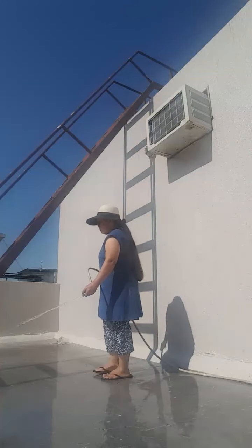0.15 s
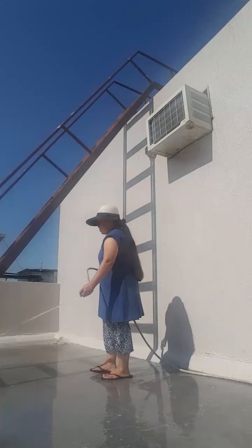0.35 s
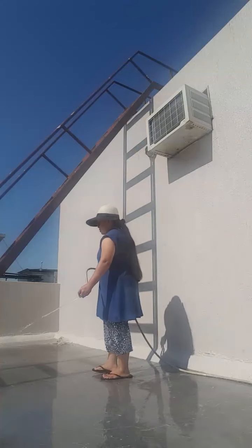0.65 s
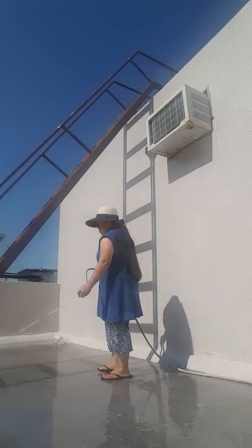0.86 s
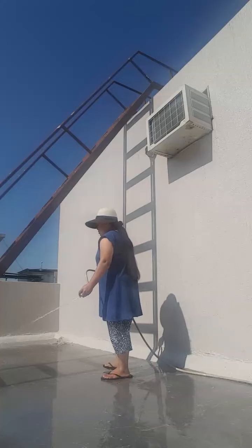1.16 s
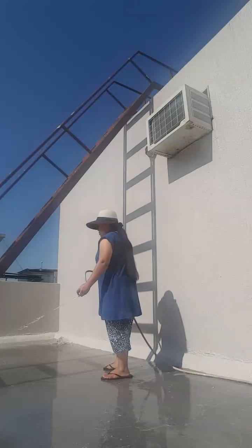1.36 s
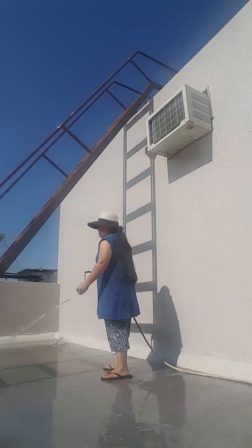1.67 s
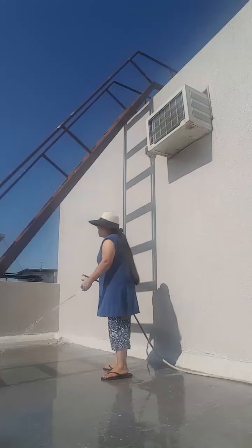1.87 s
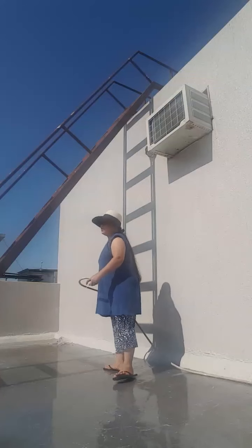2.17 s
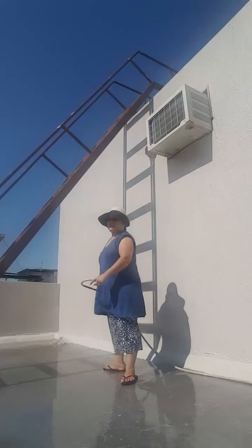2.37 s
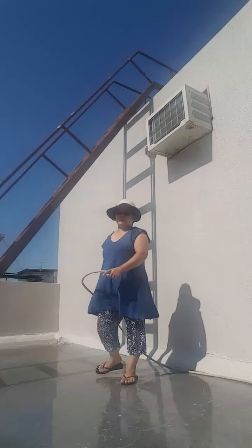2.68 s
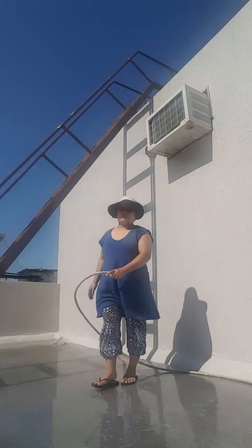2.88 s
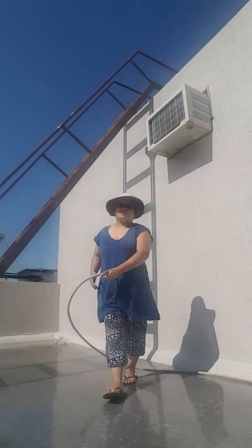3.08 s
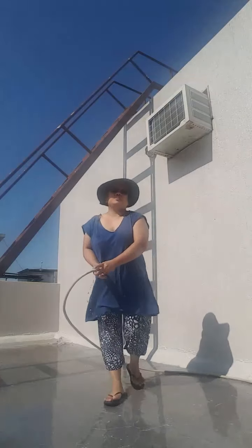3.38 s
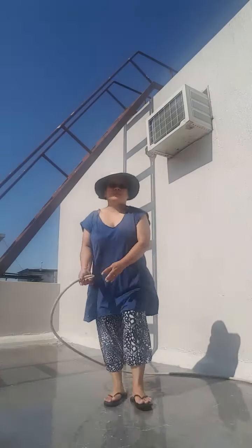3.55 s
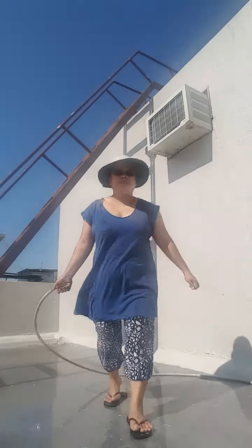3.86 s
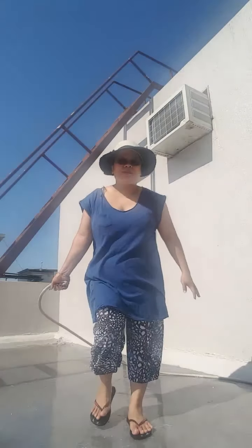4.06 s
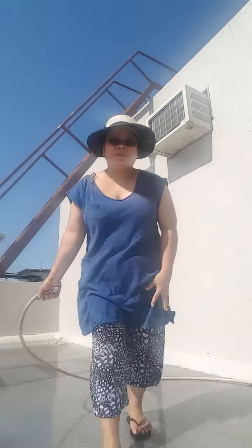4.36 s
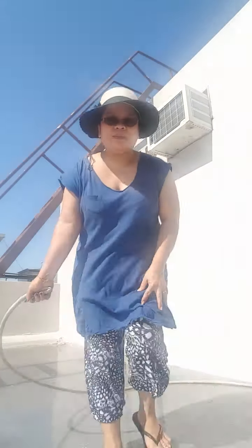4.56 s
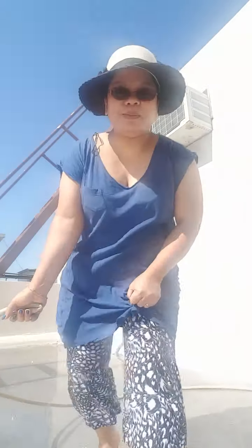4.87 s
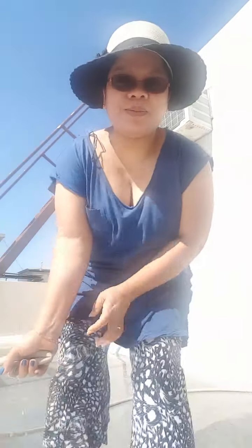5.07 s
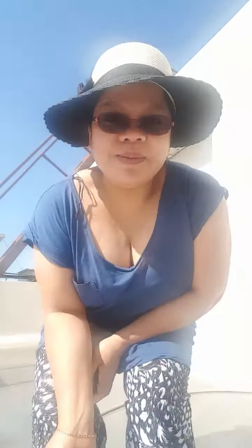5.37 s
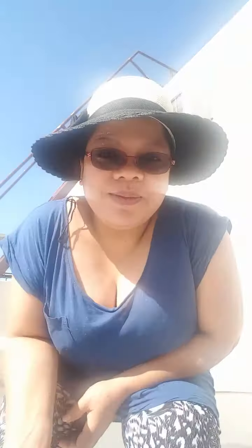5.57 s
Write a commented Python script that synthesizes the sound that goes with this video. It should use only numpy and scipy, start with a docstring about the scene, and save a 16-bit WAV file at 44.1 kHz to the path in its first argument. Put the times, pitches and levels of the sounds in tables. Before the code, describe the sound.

From 0 to about 2 seconds, a hose jet makes a dense, bright, hissing splatter on wet concrete, slightly uneven, with duller patter and sharp single drops standing out near 0.5, 0.7, 1.3 and 1.5 seconds. Soft low wind thuds hit the microphone around 1.3 to 1.9. Just after 2.0 the spray falls away within a few tenths of a second to a faint dribble. A steady low motor hum, with a firm octave and fluttering fan rush, runs throughout and swells slightly at the end. Small birds give brief sweeping chirps near 1.7, 2.1, 2.7, 3.3, 4.1 and 5.6, with fainter distant calls. From 3.1, wet sandals slap and squelch irregularly, stronger near 3.6, 4.2 and 4.7, amid fine drips growing clearer. Soft brushing and dragging follow around 5.1, a small click at 5.4, and a faint airy rustle closes it. Nearby walls give short reflections.

```python
"""On a concrete roof with walls, a hose sprays for two seconds, then the splatter dies away.
The splatter is a random hail of tiny hits; single drops and wet sandal steps are short bursts of noise.
A motor, likely an air conditioner, hums in sines over the noisy rush of its fan; small birds call in
gliding sines, and puffs of wind thud. Walls throw back the splatter, drips, steps and bird calls."""
import sys
import numpy as np
from scipy import signal
from scipy.fft import rfft, irfft, next_fast_len
from scipy.io import wavfile
from scipy.ndimage import uniform_filter1d, map_coordinates

SR = 44100
rng = np.random.default_rng(int(sys.argv[2]) if len(sys.argv) > 2 else 0)


def master_out(mix):
    """Clip the mix to full scale and print it as 16-bit PCM to the path in sys.argv[1]."""
    frames = np.transpose(np.atleast_2d(mix))
    ceiling = np.clip(frames, -1, 1)
    pcm = np.round(ceiling * 32767).astype(np.int16)
    wavfile.write(sys.argv[1], SR, pcm)


N = 252693
TIME = np.arange(N) / SR

# Tone colour of the splatter. Each row: frequency in Hz, relative level in dB per Hz.
SPLATTER_COLOUR = [(1000, -43), (2000, -7), (2500, -12.5), (3300, -10.5), (4600, -7.5), (6500, -4),
                   (7400, -6.5), (8450, 2.5), (8950, -4.5), (9300, -2), (10700, -13.5), (11350, -5),
                   (12050, -14.5), (12600, -6), (14400, -14), (15500, -15.5)]
# Duller patter where the core of the jet lands, changing as it is swept.
# Each row: time in seconds, relative level in dB, centre in Hz.
PATTER_PATH = [(0, -55, 3350), (.3, -44, 3280), (.6, -65, 3820), (.9, -40, 4740), (1.2, -58, 4700),
               (1.45, -46, 4900), (1.75, -40, 4300), (2.2, -72, 4300), (2.5, -80, 4200)]
# The loudest close drops. Each row: start in seconds, peak in dB, centre in Hz.
CLOSE_DROPS = [(0.024, -19, 7900), (.1776, -20, 8300), (.5283, -16, 10000), (0.7368, -14.5, 8800),
               (1.3318, -16, 7000), (1.369, -19.5, 8000), (1.545, -17, 8100), (2.469, -42, 10000),
               (2.5357, -39, 9000)]
# Wet sandal slaps and squelches. Each row: start in seconds, peak in dB before reflections,
# centre in Hz, time to fade by 60 dB in seconds, sharpness q of the ring.
SANDAL_SLAPS = [(3.1419, -32, 11000, 0.023, 1), (3.149, -31, 5800, 0.025, 0.91),
                (3.5819, -26.5, 10800, 0.022, 0.56), (3.6113, -24, 3600, 0.028, 0.84),
                (3.643, -35, 4000, 0.024, 1.4), (3.7, -28.5, 6200, 0.013, 3.5),
                (3.7934, -34, 7000, 0.045, 0.92), (3.821, -29, 3600, .02, 2),
                (3.8343, -25, 5700, 0.0085, 2.2), (3.9518, -27, 1800, 0.035, 0.83),
                (4.2079, -20, 2200, 0.022, 1.3), (4.211, -29, 6500, 0.015, 2.6),
                (4.221, -41, 5000, 0.022, 1.5), (4.583, -37.5, 2720, 0.04, 4.9),
                (4.7167, -26, 2880, 0.034, 8), (4.7402, -38, 5000, 0.015, 1.3),
                (4.752, -23.5, 2050, 0.016, 4), (4.764, -36, 3000, 0.02, 1.5),
                (4.836, -35.5, 4000, 0.026, 1.5), (5.181, -33, 7800, 0.034, 1.1),
                (5.429, -21, 2000, 0.004, 5.9)]
# Soles, hose and clothes brushing. Each row: start in seconds, length in seconds,
# level in dB before reflections, centre in Hz, sharpness q.
BRUSHES = [(3.234, 0.075, -44, 8360, 0.32), (3.592, 0.15, -59, 6450, 0.91), (4.703, 0.062, -49, 2700, 1),
           (4.714, 0.065, -59, 5800, 1.7), (4.876, 0.1, -58, 7000, 0.78), (5.115, 0.26, -48, 1600, 2.8),
           (5.225, 0.096, -56, 6400, 4.5), (5.578, 0.33, -58.5, 14300, 1.9)]
# The motor's lowest tone. Each row: time in seconds, relative level in dB.
MOTOR_LOW_LEVEL = [(0.08, -28.5), (0.53, -26), (0.66, -30), (0.84, -25), (1.67, -27.5), (1.7, -35),
                   (1.78, -26.5), (2.12, -23), (2.31, -28.5), (2.97, -28.5), (3.14, -23), (3.7, -28.5),
                   (3.82, -24.5), (4.59, -26.5), (4.71, -32.5), (4.81, -27.5), (5.59, -25), (5.68, -30.5)]
# Its octave, which swells at the end. Each row: time in seconds, level in dB.
MOTOR_OCTAVE_LEVEL = [(0, -21.5), (2.1, -21), (2.85, -22), (3.95, -21), (4.58, -23), (5.7, -18.2)]
# Weaker motor tones. Each row: multiple of the motor's pitch, relative level in dB.
MOTOR_OVERTONES = [(3, -40), (4, -51), (5, -53), (13, -47.5), (14, -55.5), (22, -61)]
# A weaker hum just above the motor's. Each row: multiple of that hum's pitch, level in dB.
SECOND_HUM = [(1, -49.5), (2, -46)]
# Wavering tones of fan and casing. Each row: middle frequency in Hz, relative level in dB.
CASING_TONES = [(48, -50), (121, -37), (142, -37.5), (239, -43), (481, -46), (567, -46), (582, -48.5),
                (757, -43.5), (766, -46), (921.5, -42.5), (1213, -52), (3295, -75), (3634, -67),
                (4048, -66.5)]
# Tone colour of the fan's rush. Each row: frequency in Hz, relative level in dB per Hz.
FAN_COLOUR = [(20, -28), (45, -7), (80, -2), (140, 2.5), (260, -1.5), (400, -2.5), (540, -4), (680, -5.5),
              (800, -4), (1080, -9.5), (1260, -8.5), (1420, -16), (1650, -28), (2000, -51.5)]
# How loud that rush is. Each row: time in seconds, relative level in dB.
FAN_RUSH_LEVEL = [(0, -32), (2, -32), (2.6, -32.5), (4.3, -31.5), (5.73, -31.5)]
# Faint hiss of air and trickling water. Each row: frequency in Hz, relative level in dB per Hz.
HISS_COLOUR = [(1200, -30), (1700, 0), (2100, 5), (2450, -7), (3100, -0.5), (3600, -13), (4150, -4),
               (5500, -12.5), (7500, -15), (8500, -10), (10100, -26.5), (11700, -27), (12500, -19),
               (15500, -26)]
# Each chirp flicks up, sweeps down to a hitch where the voice breaks, falls to a trough,
# curls up to a crest and drops away. Each row: start in seconds, gain in dB, sweep in seconds,
# curl in seconds, trough in Hz, crest in Hz, upper note in Hz, upper note in dB within the chirp.
CHIRP_LIST = [(1.687, -38, .041, 0.0104, 3480, 3770, 4400, -14),
              (2.13, -38, 0.032, 0.014, 3300, 3860, 4600, -4),
              (2.675, -39.5, .026, 0.048, 3480, 4230, 5240, -1),
              (3.348, -37, 0.036, 0.023, 3030, 3680, 4750, -5),
              (4.05, -37.5, .033, 0.027, 2980, 3660, 4320, 2),
              (5.571, -34.5, 0.038, 0.017, 3160, 3620, 4430, -13)]
# The main voice within a chirp, as dB at the start, top, hitch, break, trough, mid-curl, crest and end.
VOICE_SHAPE_DB = [-7, -4, -1, -11.5, 1.5, -7, 2.5, -10.5]
# A farther bird. Each row: start in seconds, length in seconds, level in dB before reflections,
# pitch in Hz that the glide bends around.
FAR_BIRD_CALLS = [(2.003, 0.034, -49, 2820), (2.053, 0.037, -51.5, 2960), (3.167, 0.096, -49.5, 3410),
                  (5.466, .08, -55, 3240)]
# Puffs of wind on the microphone. Each row: centre in seconds, length in seconds, relative level in dB.
WIND_PUFFS = [(1.35, 0.059, -30), (1.657, 0.075, -28.5), (1.731, 0.057, -33), (1.866, 0.064, -30)]

# The spray holds its level, fades as the jet turns away, and leaves a dribble that dies slowly.
SPRAY_DB, SPRAY_OFF_S, SPRAY_FADE_DB_PER_S = -37, 2.025, 85
DRIBBLE_DB, DRIBBLE_FADE_DB_PER_S = -63.5, 35
# Each slap throws a few droplets that land just after it, the later the weaker.
# DROPLET_DB is relative to the slap; each droplet's pitch varies around DROPLET_HZ.
DROPLET_DB, DROPLET_WITHIN_S, DROPLET_FADE_DB_PER_S = -10, 0.05, 160
DROPLET_HZ, DROPLET_T60_S = 5500, 0.008
# The motor runs at one speed; the weaker hum is a little higher and beats against it.
MOTOR_HZ, BEAT_HZ = 97.08, 2.99
# Parts shared by all chirps of the near bird.
FLICK_S, DROP_S, START_HZ, TOP_HZ, END_HZ = 0.007, 0.017, 4770, 5100, 3110
HITCH_HZ, HITCH_S, HITCH_RISE_HZ, BREAK_S = 3900, 0.0071, 177, 0.0085
# At the hitch the second voice adds a short, sagging upper note.
UPPER_S, UPPER_SAG_HZ, UPPER_FADE_DB = 0.034, 140, -20
# It also sounds faintly from the top of the opening flick.
FLICK_UPPER_HZ, FLICK_UPPER_DB = 5900, -17


def amp(db):
    """Turns decibels into a plain multiplier."""
    return 10 ** (np.asarray(db) / 20)


def unit(x):
    """Scales a sound to an average strength (rms) of 1."""
    return x / np.sqrt(np.mean(x ** 2) + 1e-20)


def curve(rows):
    """Joins (seconds, value) rows by straight lines."""
    return np.interp(TIME, *np.transpose(rows))


def add(mix, start_s, sound):
    """Lays a sound into the mix at a time, cutting off what runs past the end."""
    part = mix[max(round(start_s * SR), 0):][:len(sound)]
    part += sound[:len(part)]


def colour(x, points):
    """Gives a sound the tone colour of (Hz, dB) points, at rms 1."""
    f, db = np.transpose(points)
    size = next_fast_len(len(x))
    hz = np.fft.rfftfreq(size, 1 / SR)
    shape_db = np.interp(np.log(hz + 1), np.log(f), db, left=-60, right=-90)
    return unit(irfft(rfft(x, size) * amp(shape_db), size)[:len(x)])


def drift(rate, size=N):
    """A smooth random wander of rms about 1 that changes about rate times a second."""
    knots = rng.standard_normal(4096)
    return map_coordinates(knots, [np.arange(size) * rate / SR], order=2, mode="wrap") * 1.131


def band(x, hz, q):
    """One broad resonance, like a dull ring; a low q is wide."""
    hz = min(hz, 0.4 * SR)
    w = 2 * np.pi * hz / SR
    a = np.sin(w) / (2 * q)
    return signal.lfilter([a, 0, -a], [1 + a, -2 * np.cos(w), 1 - a], x)


def walls(x, wet_db, t60):
    """Adds sparse reflections from floor and walls, dying quickly under the open sky."""
    t = np.arange(SR // 2) / SR
    sparse = (rng.random(len(t)) < 0.05) * (t > 0.003)
    taps = rng.standard_normal(len(t)) * sparse * amp(-60 * t / t60)
    reflected = signal.oaconvolve(x, taps / np.linalg.norm(taps))[:N]
    return x + amp(wet_db) * reflected


def impacts(per_s, spread_db):
    """A random hail of clicks, many small and a few large, at rms 1."""
    sizes = amp(spread_db * np.minimum(rng.exponential(1, N), 4.5)) * rng.choice([-1, 1], N)
    return unit(sizes * (rng.random(N) < per_s / SR))


def spray(surge_db=0.7, mist=0.72, sputter_db=0.9, patchy_db=0.8):
    """Thousands of drops burst on concrete; the jet breaks up in clumps over a fine mist."""
    hits = impacts(per_s=2600, spread_db=3.6) + mist * rng.standard_normal(N)
    splatter = colour(hits * amp(sputter_db * drift(140)), SPLATTER_COLOUR)
    # the wet spot wanders, so its colour shifts in patches of time and pitch
    z = signal.stft(splatter, nperseg=256)[2]
    patches = uniform_filter1d(rng.standard_normal(z.shape), size=4, axis=0)
    patches = unit(uniform_filter1d(patches, size=24, axis=1))
    splatter = signal.istft(z * amp(patchy_db * patches))[1][:N]
    since_off = np.maximum(TIME - SPRAY_OFF_S, 0)
    jet = amp(SPRAY_DB - SPRAY_FADE_DB_PER_S * since_off)
    dribble = amp(DRIBBLE_DB - DRIBBLE_FADE_DB_PER_S * since_off)
    surge = amp(surge_db * drift(14.5))
    return unit(walls(splatter, wet_db=-17, t60=0.14)) * (jet + dribble) * surge


def patter(width_hz=1500):
    """Heavier drops drum into the film of water through a broad, moving resonance."""
    s, db, hz = np.transpose(PATTER_PATH)
    turn = np.exp(2j * np.pi * np.cumsum(np.interp(TIME, s, hz)) / SR)
    smooth = signal.butter(2, width_hz / 2, fs=SR, output="sos")
    # shift the moving centre down to 0 Hz, keep what lies near it, and shift back up
    shifted = impacts(per_s=490, spread_db=5) / turn
    ring = (turn * signal.sosfilt(smooth, shifted)).real
    return unit(ring) * amp(np.interp(TIME, s, db) - 5)


def splash(db, hz, t60, q):
    """A film of water bursts: a sharp, quickly dying crack with little above its ring."""
    t = np.arange(SR // 8) / SR
    burst = band(rng.standard_normal(len(t)) * amp(-60 * t / t60), hz, q)
    lowpass = signal.butter(2, min(1.6 * hz, SR / 2 - 1000), fs=SR, output="sos")
    burst = signal.sosfilt(lowpass, burst)
    return amp(db) * burst / abs(burst).max()


def close_drops(t60=0.0028):
    """Single large drops burst as short cracks that stand out of the splatter."""
    out = np.zeros(N)
    for s, db, hz in CLOSE_DROPS:
        add(out, s, splash(db, hz, t60, q=3.5))
    return out


def drips(level_db=-62):
    """Small ticks of water on the wet floor, clearer as the hose is carried closer."""
    hits = impacts(per_s=140, spread_db=4.5)
    ticks = colour(hits, [(1500, -10.5), (2800, 2.5), (6000, -4), (8600, -3.5), (10500, -18), (15000, -10.5)])
    near = np.interp(TIME, [3, 3.7, 4.8, 5.7], [0.15, 1.4, 2.1, 0.8])
    return amp(level_db) * near * unit(walls(ticks, wet_db=2, t60=0.062))


def sandals(grain_db=3.8):
    """Soles slap, squelch and throw droplets; feet, hose and clothes drag with a grainy swish."""
    out = np.zeros(N)
    for s, db, hz, t60, q in SANDAL_SLAPS:
        add(out, s, splash(db, hz, t60, q))
        for late, pitch in rng.random((3, 2)) * [DROPLET_WITHIN_S, 1]:
            droplet_db = db + DROPLET_DB - DROPLET_FADE_DB_PER_S * late
            add(out, s + late, splash(droplet_db, DROPLET_HZ * (0.5 + pitch), DROPLET_T60_S, q=1.5))
    for s, length, db, hz, q in BRUSHES:
        size = int(length * SR)
        grains = rng.standard_normal(SR)[:size] * amp(grain_db * drift(420, size))
        swish = band(grains, hz, q) * np.hanning(size) ** 0.15
        add(out, s, amp(db) * unit(swish))
    return walls(out, wet_db=-9.5, t60=0.3)


def motor(low_db=-0.7, low_waver_db=0.7, octave_waver_db=0.71, waver_db=3.0, whine_waver_db=3.5,
          wander_hz=2.625):
    """Two firm tones and wavering overtones on one shaft speed, a beating hum, and loose fan tones."""
    turn = 2 * np.pi * MOTOR_HZ * TIME
    low_level = amp(curve(MOTOR_LOW_LEVEL) + low_db + low_waver_db * drift(9.9))
    out = low_level * np.sin(turn + 2 * np.pi * rng.random())
    out += amp(curve(MOTOR_OCTAVE_LEVEL) + octave_waver_db * drift(12)) * np.sin(2 * turn)
    for k, db in SECOND_HUM:
        out += amp(db) * np.sin(2 * np.pi * (k * (MOTOR_HZ + BEAT_HZ) * TIME + rng.random()))
    for k, db in MOTOR_OVERTONES:
        out += amp(db - 3 + waver_db * drift(9)) * np.sin(k * turn + 2 * np.pi * rng.random())
    for hz, db in CASING_TONES:
        phase = 2 * np.pi * np.cumsum(hz + wander_hz * drift(24.97)) / SR
        out += amp(db - 4.5 + whine_waver_db * drift(12)) * np.sin(phase)
    return np.sqrt(2) * out  # so a sine's level in dB is its rms


def fan(rush_db=-1.0, flutter_db=0.72, hiss_db=-49.5):
    """Turbulent air makes a fluttering rush of noise, with a thin hiss above it."""
    level = amp(curve(FAN_RUSH_LEVEL) + rush_db + flutter_db * drift(30))
    rush = colour(rng.standard_normal(N), FAN_COLOUR) * level
    return rush + colour(rng.standard_normal(N), HISS_COLOUR) * amp(hiss_db)


def whistle(at, hz, db, rasp=0.02):
    """One voice of the syrinx (voice organ): a slightly raspy sine gliding through turning points."""
    t = np.arange(0, at[-1], 1 / SR)
    glide = np.interp(t, at, hz) * (1 + rasp * drift(897, len(t)))
    level = np.sqrt(2) * amp(np.interp(t, at, db)) * signal.windows.tukey(len(t), 0.1)
    return level * np.sin(2 * np.pi * np.cumsum(glide) / SR)


def chirp(sweep_s, curl_s, trough_hz, crest_hz, upper_hz, upper_db):
    """Both voices of the syrinx through one chirp, each a gliding whistle."""
    at = np.cumsum([0, FLICK_S, sweep_s, HITCH_S, BREAK_S, curl_s / 2, curl_s / 2, DROP_S])
    middle_hz = (trough_hz + crest_hz) / 2
    pitch = [START_HZ, TOP_HZ, HITCH_HZ, HITCH_HZ + HITCH_RISE_HZ, trough_hz, middle_hz, crest_hz, END_HZ]
    out = whistle(at, pitch, VOICE_SHAPE_DB)
    upper = whistle([0, UPPER_S], [upper_hz, upper_hz - UPPER_SAG_HZ], [upper_db, upper_db + UPPER_FADE_DB])
    add(out, FLICK_S + sweep_s, upper)
    faint_hz = [FLICK_UPPER_HZ - UPPER_SAG_HZ, FLICK_UPPER_HZ]
    add(out, FLICK_S, whistle([0, sweep_s / 2], faint_hz, [FLICK_UPPER_DB] * 2))
    return out


def birds(echo_db=-18, echo_s=0.06, tail_db=-7):
    """Two-voiced chirps sweep down and curl up, echoed off a far wall; a farther bird gives plain calls."""
    near, far = np.zeros((2, N))
    for s, db, *shape in CHIRP_LIST:
        add(near, s, amp(db) * chirp(*shape))
    for s, length, db, hz in FAR_BIRD_CALLS:
        size = int(length * SR)
        arch = np.interp(np.linspace(0, 1, size), [0, 0.4, 1], [0.99, 1.03, 0.94])
        glide = hz * (arch + 0.048 * drift(770, size))
        call = np.sin(2 * np.pi * np.cumsum(glide) / SR) * np.hanning(size) ** 0.5
        add(far, s, amp(db) * unit(call))
    tail = walls(near, wet_db=tail_db, t60=0.34) - near  # reflections alone
    echo = band(walls(near, wet_db=9, t60=0.1), 4080, q=5.5)
    add(near, echo_s, amp(echo_db) * echo)
    return near + band(tail, 4400, q=2.2) + walls(far, wet_db=0.0, t60=0.062)


def buffets():
    """Moving air thuds briefly on the microphone: short swells of low noise."""
    out = np.zeros(N)
    for s, length, db in WIND_PUFFS:
        size = int(length * SR)
        eddy = colour(rng.standard_normal(SR), [(20, -20), (65, 2), (130, 9), (350, -31)])[:size]
        add(out, s - length / 2, amp(db + 3) * unit(eddy * np.hanning(size)))
    return out


def scene():
    """Everything on the roof, at one microphone."""
    water = spray() + patter() + close_drops() + drips()
    return (water + sandals() + motor() + fan() + birds() + buffets())[None]


def record(dry, edge_hz=15600):
    """The recorder's band limit: a steep filter removes what lies above its edge."""
    lowpass = signal.firwin(511, edge_hz, window=("kaiser", 9), fs=SR)
    return signal.oaconvolve(dry, lowpass[None], "same")


dry = scene()
out = record(dry)
master_out(out)
```